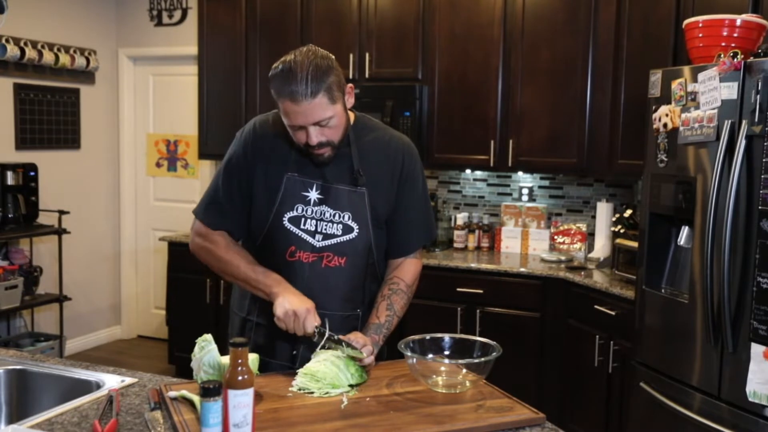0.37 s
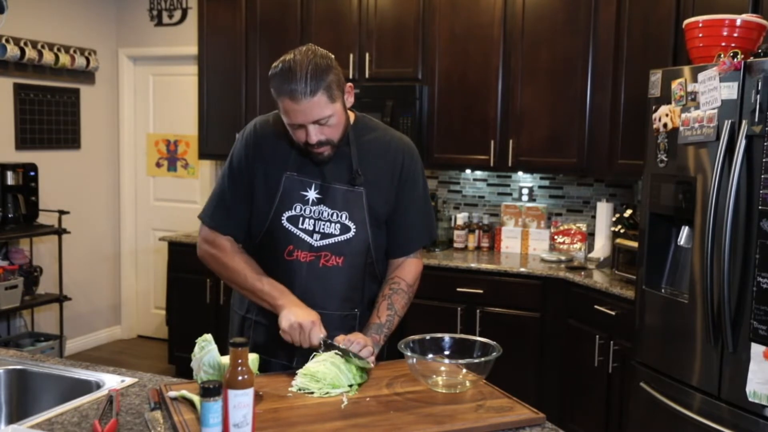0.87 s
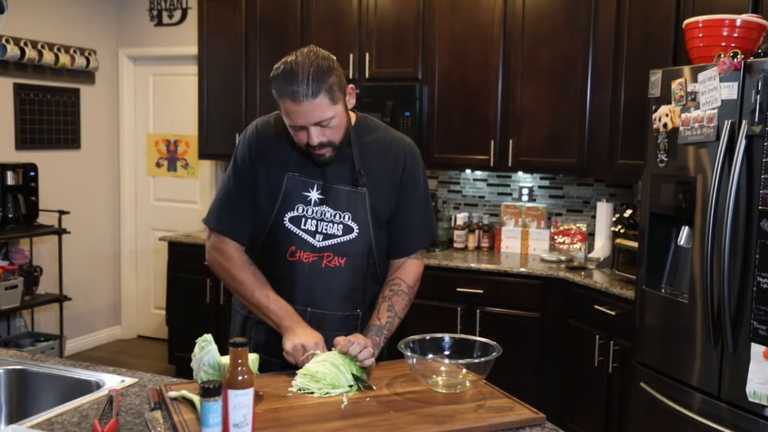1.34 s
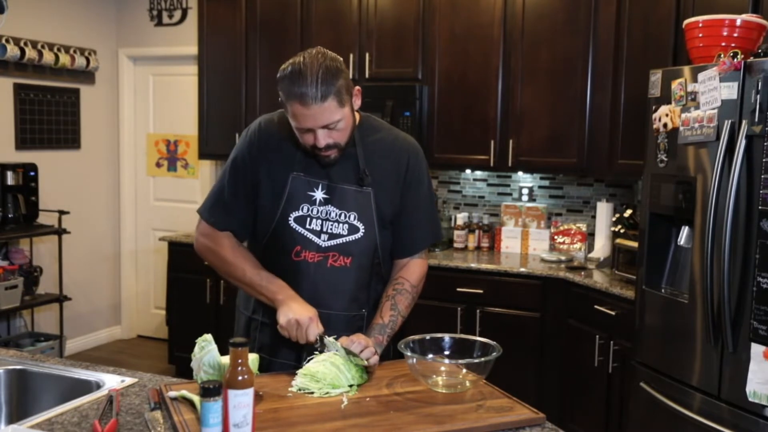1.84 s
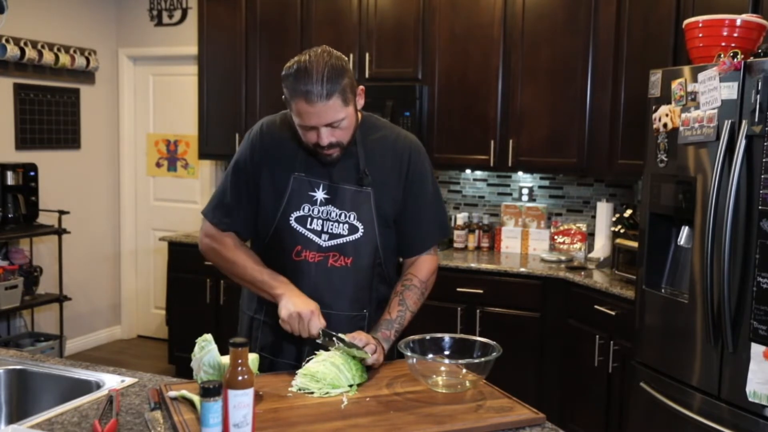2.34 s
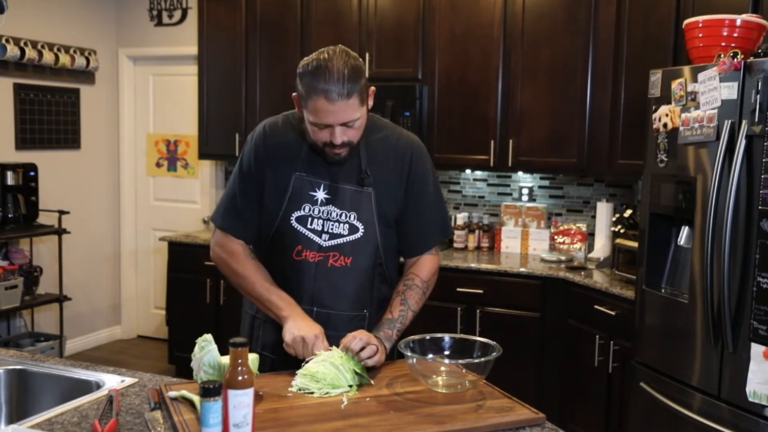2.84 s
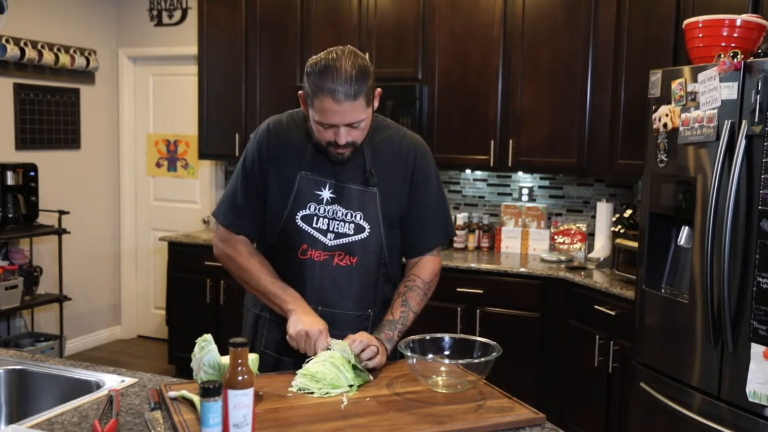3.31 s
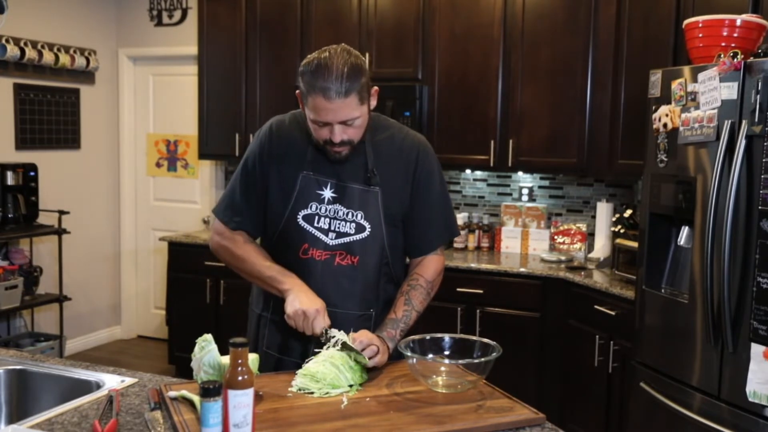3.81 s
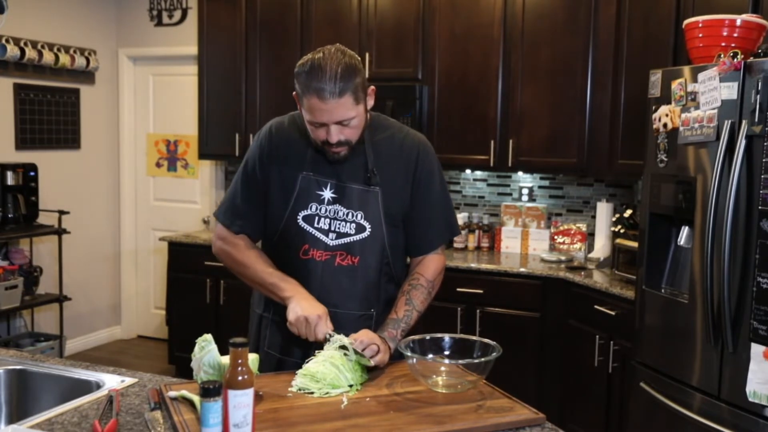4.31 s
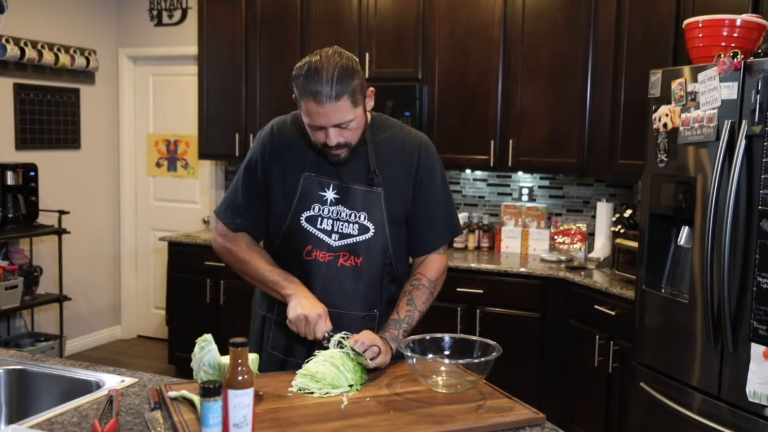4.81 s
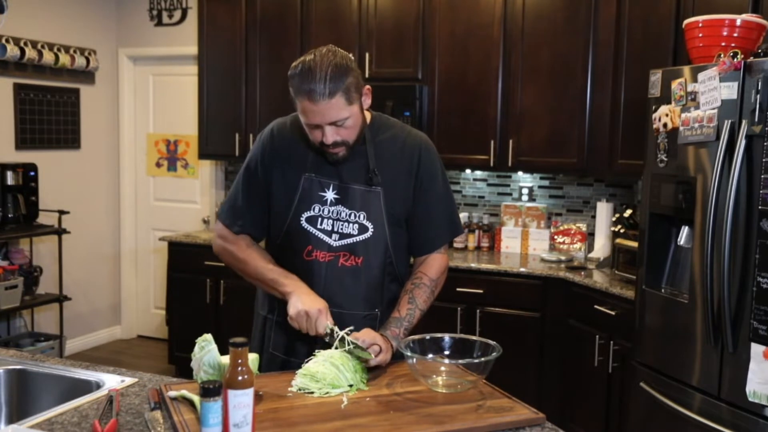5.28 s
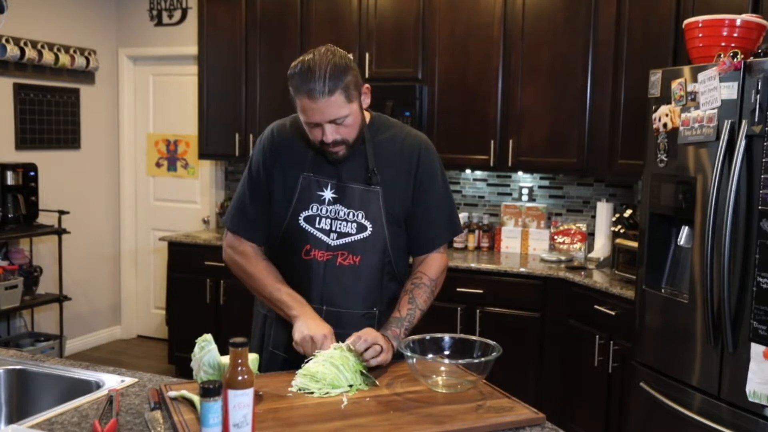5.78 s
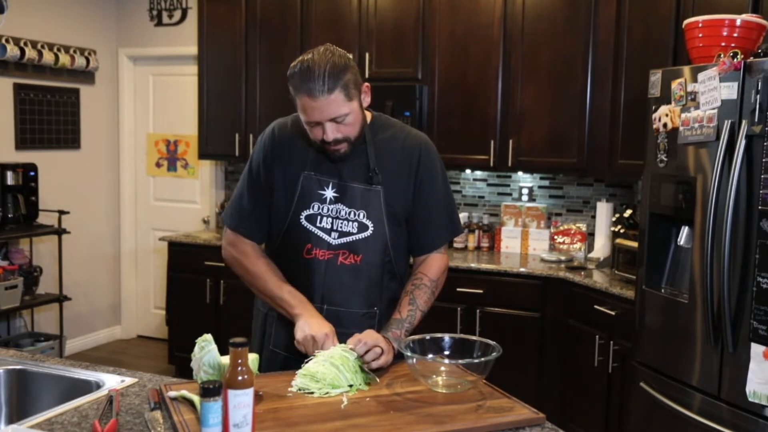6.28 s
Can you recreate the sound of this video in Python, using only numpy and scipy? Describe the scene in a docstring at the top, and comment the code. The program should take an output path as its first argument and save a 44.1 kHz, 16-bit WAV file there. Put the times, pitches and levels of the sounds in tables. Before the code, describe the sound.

A large knife crunches through crisp cabbage in slow steady strokes, each ending in a loud woody knock on a board in a reverberant kitchen.

```python
"""A large knife chops cabbage on a wooden board, ten strokes in a hard-walled kitchen.
Random clicks, coloured crisp and dull, crunch as the blade goes down; decaying board modes knock as it lands.
A glass bowl rings faintly at each blow; single echoes and a decaying tail of taps return from the room.
The knocks overload the recorder: its limiter ducks, and the echo swells up as it recovers, over steady noise."""
import sys
import numpy as np
from scipy import signal
from scipy.fft import rfft, irfft, next_fast_len
from scipy.io import wavfile
from scipy.ndimage import uniform_filter1d

SR = 44100
rng = np.random.default_rng(int(sys.argv[2]) if len(sys.argv) > 2 else 0)


def gain_from_db(level_db):
    """Turn a decibel level (scalar or array-like) into a linear amplitude factor."""
    decades = np.asarray(level_db, float) / 20
    return 10 ** decades


def log_audio(samples):
    """Write samples as a 16-bit WAV file to the path given in sys.argv[1]."""
    # one column per channel
    frames = np.atleast_2d(samples).T
    # limit to full scale, then quantise
    limited = np.clip(frames, -1, 1)
    pcm = np.round(limited * 32767).astype(np.int16)
    wavfile.write(sys.argv[1], SR, pcm)


N = 282240


def evened(x):
    """Scales to rms 1."""
    return x / np.sqrt(np.mean(x ** 2) + 1e-20)


def above(x, hz):
    """Second-order high-pass."""
    return signal.sosfilt(signal.butter(2, hz, "high", fs=SR, output="sos"), x)


def read(points, hz):
    """Reads a table on a log-frequency axis."""
    point_hz, value = np.transpose(points)
    return np.interp(np.log(hz + 1), np.log(point_hz + 1), value)


def colour(x, points):
    """Weighs the spectrum of x by a table, then scales to rms 1."""
    size = next_fast_len(len(x))
    gain = gain_from_db(read(points, np.fft.rfftfreq(size, 1 / SR)))
    return evened(irfft(rfft(x, size) * gain, size)[:len(x)])


def ring(x, peaks):
    """Sum of two-pole resonances, scaled to rms 1."""
    out = np.zeros(len(x))
    for hz, width_hz, db in peaks:
        out += gain_from_db(db) * signal.lfilter(*signal.iirpeak(hz, hz / width_hz, SR), x)
    return evened(out)


# Blade meets board. Each row: time in seconds, blow in dB, hardness 0-1,
# delay of the second contact in ms, second contact in dB re the first.
KNOCKS = [(0.0515, -7, 0.51, 2.24, -11), (0.6932, -5, 0.2, 3.5, -17), (1.2254, -5, 0.94, 5.6, 4),
          (2.0265, -7, 0.29, 3.7, -15), (2.678, -1.5, 0.95, 8.4, 0.5), (3.3866, -6.5, 0.63, 1.9, -30),
          (4.0441, -9.5, 0.56, 8, -23), (4.968, -6.5, 0.54, 1.7, -2), (5.6440, -5.5, 0.34, 2.5, -37),
          (6.3320, -6, 0.45, 0.76, -22)]
# Modes of the board on the counter. Each row: frequency in Hz, level in dB before hardness and spot, t60 in s.
BOARD_MODES = [(118, -9.5, 0.032), (405, -17.5, 0.089), (700, 10.5, 0.02), (989, 17, 0.015),
               (1339, 8.5, 0.017), (1730, -1.5, 0.03), (2234, 3.5, 0.013), (3926, 1, 0.0057),
               (6450, -15, 0.0032)]


def knocks():
    """Each blow rings the same modes; a harder blow favours the high ones, and the blade touches twice."""
    spot_db = 1.5  # each blow lands on another spot and weighs the modes anew
    tilt_db_per_octave = 4.2  # at hardness 1
    steel_soft_db, steel_hard_db = -18.5, 10  # ring of the blade re the blow
    steel_hz, steel_t60_s = 2450, 0.016
    t = np.arange(SR // 2) / SR
    steel_shape = np.sin(2 * np.pi * steel_hz * t) * (1 - np.exp(-t / 0.0012))
    out = np.zeros(N + SR)
    for start_s, blow_db, hardness, after_ms, again_db in KNOCKS:
        spot = spot_db * rng.standard_normal(len(BOARD_MODES))
        blow = np.zeros(len(t))
        for (hz, mode_db, t60_s), lean_db in zip(BOARD_MODES, spot):
            tilt_db = tilt_db_per_octave * hardness * np.log2(np.clip(hz, 700, 2600) / 1000)
            level_db = blow_db + mode_db + lean_db + tilt_db - 60 * t / t60_s
            blow -= gain_from_db(level_db) * np.sin(2 * np.pi * hz * t)
        steel_db = blow_db + steel_soft_db + (steel_hard_db - steel_soft_db) * hardness
        steel = gain_from_db(steel_db - 60 * t / steel_t60_s) * steel_shape
        first = blow * (1 - np.exp(-t / 0.00047)) + steel  # the edge bites into the wood
        out[round(start_s * SR):][:len(t)] += first
        blunt = uniform_filter1d(blow, size=7, mode="constant") + steel  # the second touch is blunter
        second = gain_from_db(again_db) * blunt * (1 - np.exp(-t / 0.0019))
        out[round((start_s + after_ms / 1000) * SR):][:len(t)] += second
    return above(out[:N], hz=109)  # the knocks carry no deep bass


# The blade goes down through the leaves. Each row: start in seconds, time to bite in seconds (used as 1 ms
# at least), then mid-stroke levels in dB of the crisp crunch, the body and the push of the hand.
STROKES = [(0.0, 0.00056, -29.5, -30, -42), (0.467, 0.012, -29.5, -29.5, -45),
           (1.086, 0.018, -30.5, -25.5, -45.5), (1.794, 0.028, -29.5, -28, -42.5),
           (2.537, .012, -30, -26.5, -45), (3.186, 0.033, -26.5, -26, -41.5),
           (3.88, 0.013, -29.5, -25.5, -41), (4.774, 0.047, -24.5, -26.5, -47),
           (5.477, 0.02, -29, -27.5, -44), (6.141, 0.033, -26, -29, -49)]


def strokes():
    """Gains of crunch, body and push: they climb as the blade bites, drift, and stop dead when it lands."""
    # columns: crunch, body, push
    touch_db = np.array([-25.5, -27, -4])[:, None]  # at first touch, re full
    quickness = np.array([1.26, 0.85, 1.3])[:, None]  # share of the bite time
    drift_db_per_s = np.array([-11, -20, 42])[:, None]
    stutter_ms, stutter_db, settled_db = 10.9, 2.5, 1  # leaf layers give one by one, most unevenly at first
    gains, depth = np.zeros((3, N)), np.full(N, 0.5)
    layers = rng.standard_normal((len(STROKES), 60))
    for (start_s, bite_s, *full_db), (landing_s, *_), layer in zip(STROKES, KNOCKS, layers):
        t = np.arange(round((landing_s - start_s) * SR)) / SR
        middle_s = (landing_s - start_s) / 2
        left = np.exp(-t / (quickness * max(bite_s, 1e-3)))  # part of the bite still to come
        layer_now = np.interp(t * 1000 / stutter_ms, np.arange(60), layer)
        uneven_db = layer_now * (settled_db + stutter_db * left)
        drift_db = drift_db_per_s * (t - middle_s)
        level_db = np.array(full_db)[:, None] + touch_db * left + drift_db + uneven_db
        edge = np.clip(np.minimum(t / 0.00041, (t[-1] - t) / 0.0032), 0, 1)
        first = round(start_s * SR)
        gains[:, first:][:, :len(t)] = gain_from_db(level_db) * edge
        depth[first:][:len(t)] = t / t[-1]
    return gains, depth


def crackle(per_s, spread_db, clump_ms, clump_db):
    """Cell walls bursting: random clicks, a few large, coming in clumps."""
    is_click = rng.random(N) < per_s / SR
    size = gain_from_db(spread_db * np.minimum(rng.exponential(1, N), 4)) * is_click
    knots = np.arange(0, N + SR, clump_ms * SR / 1000)
    clumps = np.interp(np.arange(N), knots, rng.standard_normal(len(knots)))
    return size * rng.choice([-1., 1.], N) * gain_from_db(clump_db * clumps)


def patchy(x, patch_db):
    """Random patches of louder and softer colour, as fibres of other sizes give way."""
    z = signal.stft(x, nperseg=256)[2]
    field = uniform_filter1d(rng.standard_normal(z.shape), size=7, axis=0)
    field = evened(uniform_filter1d(field, size=4, axis=1))
    return evened(signal.istft(z * gain_from_db(patch_db * field), nperseg=256)[1][:N])


# Spectrum of tearing leaves. Each row: frequency in Hz, relative density in dB per Hz.
CRUNCH_SPECTRUM = [(1000, -10.5), (1750, -9), (2200, -2), (3000, -2), (3530, -8), (4390, -8.5), (6020, -10),
                   (7430, -5.5), (14700, -2.5), (15600, -8), (16100, -48)]


def crunch(clicks):
    """Clicks heard straight from the leaves, in their crisp colour."""
    return colour(clicks, CRUNCH_SPECTRUM)


# Resonances of the cabbage under the blade. Each row: centre in Hz (shifted with depth below 1500 Hz),
# width in Hz, relative gain in dB.
BODY_PEAKS = [(610, 550, 17.5), (790, 353, 19), (1240, 120, 2), (2325, 460, 12), (2640, 130, -21)]


def dull_body(tear, depth):
    """Clicks through the cabbage's resonances; the low ones climb in pitch as the blade goes down."""
    blends = []
    for shift in (0.91, 1.1):  # blade at the top, at the bottom
        peaks = [(hz * (shift if hz < 1500 else 1), width_hz, db) for hz, width_hz, db in BODY_PEAKS]
        blends.append(evened(above(ring(tear, peaks), hz=330)))
    top, bottom = blends
    dull = np.cos(depth * np.pi / 2) * top + np.sin(depth * np.pi / 2) * bottom
    return dull / np.sqrt(1 + np.mean(top * bottom) * np.sin(depth * np.pi))  # even loudness through the blend


# Counter under the hand. Each row: centre in Hz, width in Hz, relative gain in dB per pass.
PUSH_PEAKS = [(79, 62, -5), (122, 54, -3), (195, 390, 1.5)]


def hand_press(push):
    """Noise through the counter's low resonances twice, following the hand's push and one low bump."""
    bump_s, bump_db, bump_length_s = 3.858, -37.5, 0.025
    since = np.maximum(np.arange(N) / SR - bump_s, 0) / bump_length_s
    gain = uniform_filter1d(push, size=900) + gain_from_db(bump_db) * since * np.exp(1 - since)
    return ring(ring(rng.standard_normal(N), PUSH_PEAKS), PUSH_PEAKS) * gain


# Single leaves snap and shreds fall. Each row: start in seconds, crisp part in dB, its centre in Hz,
# dull part in dB; levels before the burst envelope.
SNAPS = [(0.185, -47, 10300, -33.5), (0.3175, -47, 10300, -36), (0.4515, -33, 12000, -25.5),
         (0.4745, -34, 9910, -30), (0.495, -32, 11200, -28), (0.8106, -52, 11000, -40),
         (0.8982, -42, 10300, -34), (0.931, -44, 8800, -42), (1.0023, -48, 12500, -42),
         (1.054, -46, 11100, -41), (1.0914, -38, 11500, -40), (1.1117, -32, 13700, -28),
         (1.66, -42, 12600, -44), (1.698, -40.5, 11400, -35), (1.7976, -40, 8920, -29.5),
         (1.821, -38, 11800, -29), (2.1847, -37, 11400, -34), (2.2145, -48, 11600, -38),
         (2.2897, -49, 7400, -37), (2.312, -43, 14100, -33.5), (2.334, -40, 11400, -35),
         (2.401, -48, 11300, -37), (2.4584, -45, 11500, -39), (2.4744, -36, 14400, -42),
         (2.4905, -30.5, 11400, -30), (2.5416, -35, 12500, -29), (2.6319, -28, 11500, -43),
         (3.009, -48, 8540, -39), (3.0222, -46, 12300, -39), (3.0924, -37, 9900, -33.5),
         (3.172, -38, 12800, -37.5), (3.192, -37, 6510, -39), (3.2126, -33, 12700, -36),
         (3.2334, -35, 9420, -24), (3.4965, -46, 8400, -40), (3.625, -49, 12300, -41),
         (3.6932, -38.5, 11500, -34.5), (3.897, -32, 12300, -28), (4.2243, -46, 13500, -52),
         (4.4154, -48, 10900, -46), (4.6008, -47, 14100, -38), (4.6169, -41, 11500, -40),
         (4.6294, -47, 11200, -54), (4.711, -45, 14400, -40), (4.816, -34, 11300, -35),
         (4.845, -29, 11100, -51), (5.1607, -48, 11200, -44), (5.2789, -46, 11300, -50),
         (5.454, -39, 12700, -36), (5.4865, -32, 10800, -38), (5.5638, -25, 10800, -46),
         (5.7608, -47, 9000, -36), (5.8212, -47, 6520, -38), (5.9414, -51, 14600, -48),
         (6.0561, -44, 12600, -55), (6.1445, -35, 10900, -39), (6.1769, -24, 7180, -53)]


def snaps(crisp, dull):
    """Small bursts of the crackle, each with its own broad colour and its own share of thud."""
    fall_ms = 7.8
    u = np.arange(2000) / SR * 1000 / fall_ms
    shape = np.minimum(u * 8, 1) * np.exp(-u ** 2)
    out = np.zeros(N)
    for start_s, crisp_db, hz, dull_db in SNAPS:
        part = slice(round(start_s * SR), round(start_s * SR) + 2000)
        snap = gain_from_db(crisp_db) * ring(crisp[part], [(hz, 0.86 * hz, 0)])
        out[part] += shape * (snap + gain_from_db(dull_db) * dull[part])
    return out


# Fingers and the lifted blade brush the leaves. Each row: start in seconds, length in seconds, peak in dB.
RUSTLES = [(0.88, .17, -56), (1.65, .07, -56), (2.17, .06, -52), (2.28, 0.086, -49), (2.38, .13, -51),
           (3.0, 0.036, -54), (3.47, 0.077, -55), (3.602, .12, -55), (4.59, .06, -54), (5.07, .24, -58),
           (5.74, .1, -55), (6.03, .05, -58)]


def rustles(crisp):
    """Soft brushing: the treble of the crackle under one smooth arch a row."""
    t = np.arange(N) / SR
    gain = np.zeros(N)
    for start_s, length_s, db in RUSTLES:
        gain += gain_from_db(db) * np.sin(np.pi * np.clip((t - start_s) / length_s, 0, 1))
    return gain * evened(above(crisp, hz=4000))


def settling():
    """Shreds settling: a sparse steady crackle, treble only."""
    ticks = patchy(crackle(per_s=2000, spread_db=7.0, clump_ms=11, clump_db=4.5), patch_db=3)
    return gain_from_db(-60.5) * evened(above(crunch(ticks), hz=5000))


def cabbage():
    """One crackle is heard twice: straight from the leaves, and through the dull body under the blade."""
    tear = patchy(crackle(per_s=14000, spread_db=2.5, clump_ms=1.6, clump_db=2.5), patch_db=1.5)
    (crisp_gain, dull_gain, push), depth = strokes()
    crisp = crunch(tear)
    dull = dull_body(tear, depth)
    chop = crisp * crisp_gain + dull * dull_gain + hand_press(push)
    return chop + snaps(crisp, dull) + rustles(crisp) + settling()


def bowl():
    """One long glass mode, set going anew by every blow."""
    hz, db, t60_s = 517, -30.5, 1.03
    t = np.arange(2 * SR) / SR
    mode = gain_from_db(db - 60 * t / t60_s) * np.sin(2 * np.pi * hz * t) * (1 - np.exp(-t / 0.0049))
    blows = np.zeros(N)
    blows[[round(row[0] * SR) for row in KNOCKS]] = 1
    return signal.fftconvolve(blows, mode)[:N]


# Colour of a soft and of a hard blow as the walls return it.
# Each row: frequency in Hz, relative density in dB per Hz.
SOFT_SPECTRUM = [(60, -30), (123, -10), (250, -22), (366, -3.5), (430, -10), (682, 3), (780, -3.5),
                 (1050, 2.5), (1500, -6), (2290, -22.5), (2860, -31.5), (4500, -39), (9000, -54),
                 (13000, -75)]
HARD_SPECTRUM = [(60, -35), (123, -12.5), (270, -24.5), (372, -4), (451, -18), (682, -2.5), (830, -7),
                 (1770, -4), (2500, -6.5), (2900, -24.5), (3650, -24.5), (5200, -34), (6100, -27),
                 (6550, -39), (7100, -29), (12000, -65)]


def cracks():
    """What each blow feeds to the far walls: one short pulse, coloured between soft and hard."""
    crack_db = 29.5  # re the blow
    hz = np.fft.rfftfreq(2048, 1 / SR)
    out = np.zeros(N + 2048)
    for start_s, blow_db, hardness, _, again_db in KNOCKS:
        share = np.clip(hardness, 0, 1)
        spectrum_db = (1 - share) * read(SOFT_SPECTRUM, hz) + share * read(HARD_SPECTRUM, hz)
        pulse = np.fft.fftshift(irfft(gain_from_db(spectrum_db)))
        strength = gain_from_db(blow_db + crack_db) * np.hypot(1, gain_from_db(again_db))  # both contacts
        out[round(start_s * SR) - 1024:][:2048] += strength * pulse / np.linalg.norm(pulse)
    return out[:N]


# First reflections. Each row: delay in ms, tap level in dB before smoothing and a gain of 3.
WALLS = [(8.6, -22), (15.5, -31), (24, -27)]


def echoes(x):
    """The first few single reflections from counter and cupboards."""
    taps = np.zeros(SR // 10)
    for ms, db in WALLS:
        taps[round(ms * SR / 1000)] = gain_from_db(db)
    return signal.oaconvolve(x, uniform_filter1d(taps, size=6) * 3)[:N]  # wood and cloth dull the treble


# Decay of the kitchen. Each row: frequency in Hz, t60 in seconds.
ROOM_DECAY = [(100, 0.66), (500, 0.56), (1000, 0.65), (2500, 0.65), (5000, 0.67), (10000, 0.25)]


def kitchen(x):
    """Dense random taps, each band dying at its own speed."""
    room_db = -11.5
    taps = np.zeros(SR)
    at = np.arange(100, SR - 20, 20)
    taps[at + rng.integers(0, 20, len(at))] = rng.choice([-1., 1.], len(at))
    hz, t, z = signal.stft(taps, SR, nperseg=256)
    decay = gain_from_db(-60 * t / read(ROOM_DECAY, hz)[:, None])
    tail = signal.istft(z * decay, SR, nperseg=256)[1]
    tail *= 1 - np.exp(-np.arange(len(tail)) / SR / 0.034)  # the echoes build up
    return signal.fftconvolve(x, tail * gain_from_db(room_db) / np.linalg.norm(tail))[:N]


# Spectrum of the quiet air and the recorder's noise. Each row: frequency in Hz, relative density in dB per Hz.
HUSH_SPECTRUM = [(15, -45), (25, -10.5), (145, -0.5), (196, -4.5), (256, 0.5), (302, -5), (453, -4.5),
                 (717, -9.5), (867, -13.5), (1340, -14), (2490, -19.5), (14100, -28.5), (16100, -34)]


def hush(level_db):
    """Steady coloured noise at an rms level."""
    return gain_from_db(level_db) * colour(rng.standard_normal(N), HUSH_SPECTRUM)


def scene():
    """Knife and cabbage in the room, over the quiet air."""
    leaves, blows = cabbage(), knocks()
    direct = leaves + blows
    room = echoes(direct) + kitchen(leaves + cracks())
    return (direct + room + bowl() + hush(level_db=-48.5))[None]


def band_limit(x):
    """A steep low-pass at the top of the band."""
    return signal.sosfilt(signal.butter(12, 16270, fs=SR, output="sos"), x)


def record(dry):
    """The limiter needs a moment to duck, so the first swings clip; it recovers at a steady rate."""
    threshold_db, recovery_db_per_s, attack_s = -4.0, 112.4, 0.0044
    level_db = 20 * np.log10(abs(dry[0]) + 1e-9)
    rise_db = np.arange(N) * recovery_db_per_s / SR
    held_db = np.maximum.accumulate(level_db + rise_db) - rise_db  # peaks, falling steadily
    over_db = np.maximum(held_db - threshold_db, 0)
    keep = np.exp(-1 / (attack_s * SR))
    duck_db = signal.lfilter([1 - keep], [1, -keep], over_db)
    hiss = hush(level_db=-47.5)  # the recorder's own, added after the ducking
    mix = np.clip(dry / gain_from_db(duck_db) + hiss, -1, 1)
    return band_limit(mix)


dry = scene()
out = record(dry)
log_audio(out)
```